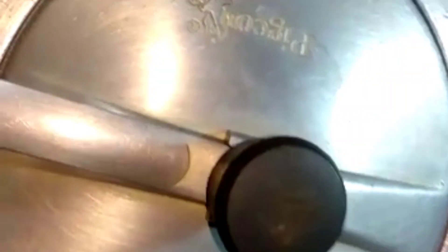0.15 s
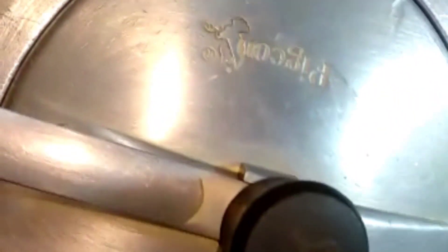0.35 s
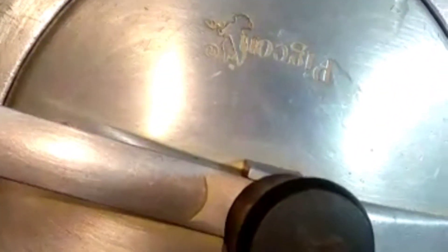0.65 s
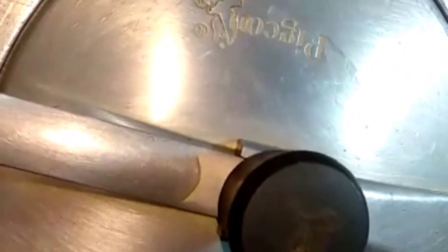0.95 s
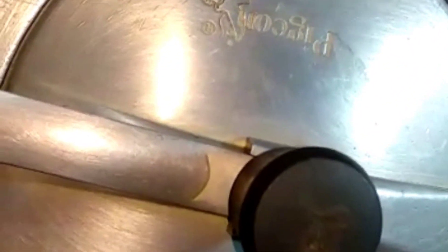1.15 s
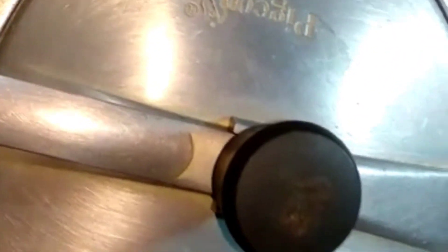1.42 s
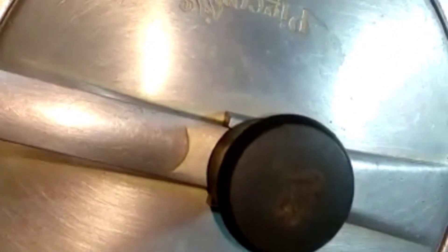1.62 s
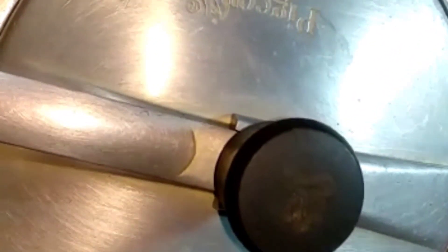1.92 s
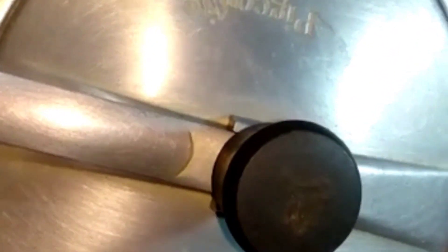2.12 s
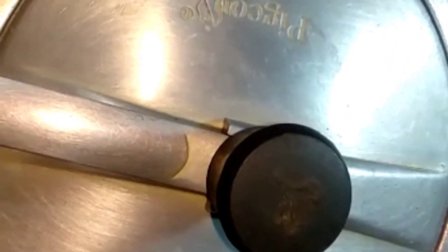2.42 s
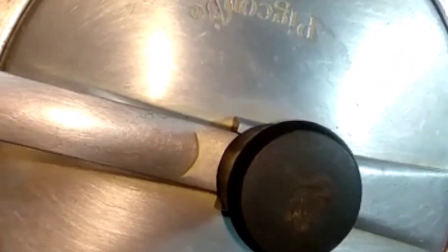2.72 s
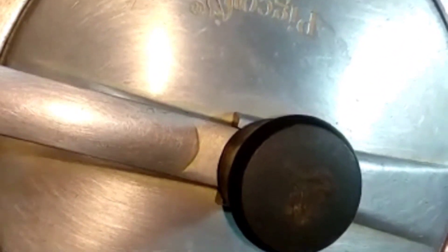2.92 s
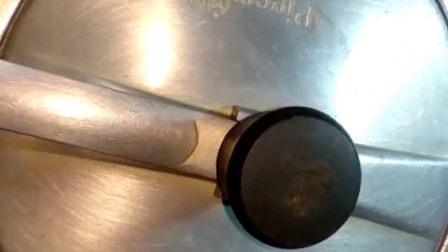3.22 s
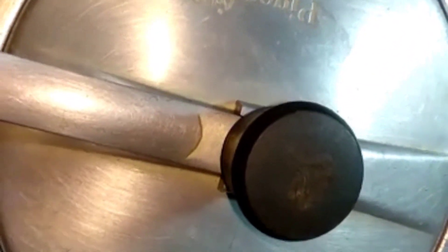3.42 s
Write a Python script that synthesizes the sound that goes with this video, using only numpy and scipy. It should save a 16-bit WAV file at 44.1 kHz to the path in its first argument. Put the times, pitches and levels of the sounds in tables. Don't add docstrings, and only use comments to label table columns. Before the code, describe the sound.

A pressure cooker hisses and thumps softly, its valve releasing three short sharp puffs of steam.

```python
import sys
import numpy as np
from scipy import signal
from scipy.fft import rfft, irfft, next_fast_len
from scipy.io import wavfile
from scipy.ndimage import uniform_filter1d, map_coordinates

SR = 44100
rng = np.random.default_rng(int(sys.argv[2]) if len(sys.argv) > 2 else 0)


def linear_from_db(decibels):
    return 10 ** (np.asarray(decibels, float) / 20)


def store_pcm(level_fs):
    pcm = np.round(np.clip(level_fs, -1, 1) * 32767).astype(np.int16)
    wavfile.write(sys.argv[1], SR, np.atleast_2d(pcm).T)


N = 156555

# f/Hz, level/dB
LEAK_COLOUR = [(180, -12.5), (300, -3.5), (540, -5.5), (2000, -11.5), (4200, -15), (6500, -11),
               (11000, -9.5), (14200, -16), (16500, -20)]
# f/Hz, likeness (0 to 1)
LEAK_ALIKE = [(60, 1), (180, .95), (650, 0.55), (1300, 0.05), (15000, 0.02)]
# f/Hz, level/dB
LEAK_SIDE = [(60, -0.5), (150, 0), (380, 0), (950, 2.5), (2380, 5.5), (5980, 5.5), (15000, -8.5)]
# t/s, peak level/dB, f/Hz
THUMPS = [(0.028, -29, 120.6), (0.115, -25.5, 116), (0.19, -35, 118), (0.29, -54, 121), (0.434, -35, 111),
          (0.664, -33.5, 121), (0.769, -45, 114), (0.856, -35, 121), (1.001, -33, 122), (1.041, -24, 118.5),
          (1.213, -34, 127), (1.344, -31, 122), (1.508, -32, 123), (1.667, -29.5, 200), (1.742, -24, 112),
          (1.799, -57, 99.6), (1.869, -38, 106), (2.098, -35, 214), (2.229, -31.5, 95), (2.414, -36, 109),
          (2.49, -38.5, 111), (2.574, -23.5, 117), (2.699, -27.5, 104), (2.799, -22.5, 107),
          (2.894, -40, 239), (2.97, -25, 110), (3.189, -29, 184), (3.337, -26, 118.5), (3.48, -39.5, 221)]
# f/Hz, level/dB, share of the main tone's length
UPPER_TONES = [(188.3, -7.5, 0.49), (306, -9.5, 0.53), (82.5, -9, 0.49)]
# f/Hz, width/Hz, level/dB
BASE_TONES = [(74.4, 45, -13), (116.7, 17.5, 0), (193.8, 31.5, -6), (254.5, 45, -12.5), (331, 56, -15.5)]
# f/Hz, likeness (0 to 1)
BASE_ALIKE = [(30, 0.6), (60, 0.93), (90, 1), (300, 0.94)]
# t/s, peak level/dB, f/Hz, rattle level/dB
PINGS = [(0.14, -42.5, 740, -8), (0.187, -38, 784, -11), (0.516, -38.5, 850, -12),
         (0.858, -38.5, 1110, -26), (1.061, -15, 760, -8), (1.346, -32, 872, -13), (1.525, -28.5, 884, -32),
         (1.729, -33, 760, -7), (1.805, -32, 1020, -4.5), (1.873, -44, 880, -6), (2.102, -34.5, 825, -25),
         (2.145, -25.5, 756, -8), (2.233, -29.5, 705, -31), (2.29, -42, 735, -16), (2.337, -30.5, 910, -7),
         (2.398, -27.5, 715, -10.5), (2.444, -33, 730, -21), (2.669, -17.5, 795, -18.5),
         (2.848, -36.5, 684, 7), (2.961, -20, 744, -15), (3.071, -31, 762, -3.5), (3.104, -19, 772, -11.5),
         (3.238, -17, 900, -10)]
# f/Hz, level/dB, t60/s (not used)
WALL_TONES = [(528, 4.5, 0.13), (685, 3, 0.32), (872, 3, 0.22), (966, -42, 0.56), (1099, -5.5, 0.21),
              (1186, -35, 0.38), (1710, -4, 0.27), (2000, -32.5, 0.24), (2090, -47, 0.59), (2410, -24, 0.2)]
# f/Hz, level/dB, t60/s (not used)
WALL_LOWEST = (335, -8.5, .3)
# f/Hz, level/dB
RATTLE_COLOUR = [(590, -7), (1000, -0.5), (1340, -8.5), (2350, -5.5), (10600, -20), (15200, -29),
                 (15900, -27), (16500, -55)]
# f/Hz, likeness (0 to 1)
KNOCK_ALIKE = [(60, 0.97), (240, 0.85), (800, 0.8), (1300, 0.03), (15000, 0.05)]
# f/Hz, level/dB
KNOCK_SIDE = [(60, 0.5), (180, 3), (550, -0.5), (1650, 6.5), (4970, 8), (15000, -5.5)]
# t/s, level/dB, t60/s
SPITS = [
    (1.0605, -30.5, 0.18),
    (2.669, -46, .03),
    (3.104, -41, .05),
    (1.805, -48, .03),
]
# f/Hz, level/dB
SPIT_COLOUR = [(500, -30), (2000, -21), (8000, 11), (12000, 1), (15500, -5)]
# t/s, level/dB
CLATTER = [
    (1.061, -28.5),
    (1.079, -40),
    (3.221, -30.5),
    (3.237, -16.5),
    (3.246, -15),
    (3.251, -12.5),
    (3.261, -22.5),
    (3.271, -24),
    (3.282, -29),
]
# f/Hz, level/dB, t60/s
LID_TONES = [(319.6, -10, 0.26), (501, -3, 0.15), (595, -1, 0.17), (683, -9.5, 0.43), (928, 10, 0.062),
             (1050, 2, 0.28), (1114, 1.5, 0.21), (1606, -11, 0.1), (1720, -1, 0.13), (1830, -15, 0.17),
             (2207, -33, 0.39), (2340, -2, 0.28), (2358, -18, 0.14), (2778, -9, 0.2)]
# t/s, peak level/dB, jet held/s, closing/s per 20 dB, spray level/dB, whistle f/Hz
LIFTS = [
    (1.5224, -8.5, 0.095, 0.22, -12.5, 9030),
    (2.14, -12.5, 0.1, 0.33, -8, 8370),
    (2.8453, -12, 0.11, 0.26, -1.5, 8360),
]
# f/Hz, level/dB
POP_COLOUR = [(290, -38), (500, -21), (1430, -11), (3450, -4.5), (4830, -7.5), (8930, 2.5), (10000, -5.5),
              (13200, -4.5), (16500, -29)]
# f/Hz, level/dB
POP_SIDE = [(60, -2.5), (240, 20), (950, 7), (3770, 12.5), (15000, -6)]
# f/Hz, level/dB
JET_COLOUR = [(260, -16), (500, -3.5), (1100, -16.5), (4500, -14.5), (6500, -13), (10000, -10),
              (13000, -4.5), (15800, -26)]
# f/Hz, likeness (0 to 1)
JET_ALIKE = [(60, 0.92), (240, 0.73), (700, 0.5), (1300, 0.03), (15000, 0.05)]
# f/Hz, level/dB
JET_SIDE = [(60, -0.5), (180, -2), (550, -1.5), (1650, -6), (4970, 8), (15000, -1)]
# f/Hz, level/dB
SPRAY_COLOUR = [(300, -46), (600, 7), (3000, 1), (6000, -2.5), (15500, -1.5), (16500, -30)]
# f/Hz, rarity/sigma
GAPS = [(2600, 1.7), (3600, 1.1), (5500, 1.15), (7000, 1.7), (9300, 1.3), (15000, 1.4)]

STEAM_RISE_S, JET_DB = 0.00089, -18


def unit(x):
    return x / np.sqrt(np.mean(x ** 2) + 1e-20)


def along(points, hz):
    f, v = np.transpose(points)
    return np.interp(np.log(hz + 1), np.log(f + 1), v)


def colour(points):
    return lambda hz: linear_from_db(along(points, hz))


def wobble(rate):
    knots = rng.standard_normal(int(N * rate / SR) + 4)
    return map_coordinates(knots, [np.arange(N) * rate / SR])


def filtered(x, response):
    m = next_fast_len(N + SR // 2)
    return irfft(rfft(x, m) * response(np.fft.rfftfreq(m, 1 / SR)), m)[..., :N]


def peaks(rows):
    def response(f):
        total = 0
        for k, (centre, width, db) in enumerate(rows):
            damping = 1j * f * width
            total = total + (-1) ** k * linear_from_db(db) * damping / (centre ** 2 - f * f + damping)
        return total
    return response


def rush(gain, alike, side, patchy_db):
    z = signal.stft(rng.standard_normal((2, N)), nperseg=512)[2]
    patches = uniform_filter1d(rng.standard_normal(z.shape[1:]), size=5, axis=0)
    patches = unit(uniform_filter1d(patches, size=9, axis=1))
    pair = signal.istft(z * linear_from_db(patchy_db * patches), nperseg=512)[1][:, :N]
    m = next_fast_len(N)
    hz = np.fft.rfftfreq(m, 1 / SR)
    shared, opposed = rfft(pair, m)
    turn = np.arccos(np.clip(along(alike, hz), -1, 1)) / 2
    tilt = linear_from_db(along(side, hz) / 2)
    shared, opposed = np.cos(turn) * shared, np.sin(turn) * opposed
    ports = np.array([(shared + opposed) * tilt, (shared - opposed) / tilt])
    out = irfft(ports * gain(hz) / np.cos(turn), m)[:, :N]
    return out / np.std(out.mean(axis=0))


def swell(db, rise_s, t60):
    return lambda t: linear_from_db(db - 60 * t / t60) * (1 - np.exp(-(t / rise_s) ** 2))


def lay(shapes):
    out, t = np.zeros(N + SR), np.arange(SR // 2) / SR
    for s, shape in shapes:
        out[max(round(s * SR), 0):][:len(t)] += shape(t)
    return out[:N]


def lay_power(rows, t60):
    def power(db):
        return lambda t: swell(db, 0.0028, t60)(t) ** 2
    return lay([(s, power(db)) for s, db in rows]) ** .5


def leak():
    level = linear_from_db(-43.5 + 0.26 * wobble(3.5) + 1.0 * wobble(29.98))
    return level * rush(colour(LEAK_COLOUR), LEAK_ALIKE, LEAK_SIDE, patchy_db=.6)


def churning():
    def stir(db):
        return lambda t: linear_from_db(db - 12.5 - 60 * t / 0.44)
    churn = lay([(s, stir(db)) for s, db, _ in THUMPS])
    simmer = linear_from_db(-50 + 4.5 * wobble(9.54) + 2.2 * wobble(21.87))
    return (churn + simmer) * rush(peaks(BASE_TONES), BASE_ALIKE, LEAK_SIDE, patchy_db=1.5)


def thumps():
    rise_s, length_s = 0.0069, 0.038

    def jolt(db, main_hz):
        def shape(t):
            total = 0
            for hz, more, share in [(main_hz, 0, 1)] + UPPER_TONES:
                fade_db = 8.0 * (t / (length_s * share)) ** 2
                total = total + linear_from_db(db + more - fade_db) * np.sin(2 * np.pi * hz * t)
            return (1 - np.exp(-t / rise_s)) * total
        return shape
    return lay([(s - .003, jolt(db - 5, hz)) for s, db, hz in THUMPS])


def pings():
    chirp_per_s = 25.7

    def bubble(db, hz):
        envelope = swell(db + 3, 0.00091, 0.023)
        return lambda t: envelope(t) * np.sin(2 * np.pi * 0.889 * hz * t * (1 + chirp_per_s * t))
    balance_db = [[.6], [-.6]]
    return lay([(s, bubble(db, hz)) for s, db, hz, _ in PINGS]) * linear_from_db(balance_db)


def wall_ring():
    hits = [(s + 0.0015, db - 16) for s, db, *_ in PINGS] + [(s, db - 14) for s, db in CLATTER]
    tones = []
    for hz, db, _ in [WALL_LOWEST] + WALL_TONES:
        width_hz = 34 * (hz / 500) ** 0.31
        tones.append((hz, width_hz, 1.06 * db - 3.5 * np.log2(hz / 500)))
    return lay_power(hits, 0.26) * rush(peaks(tones), KNOCK_ALIKE, KNOCK_SIDE, patchy_db=1.5)


def rattle():
    clatter_db = -7.5
    hits = [(s + 0.0015, db + more) for s, db, _, more in PINGS]
    hits += [(s, db + clatter_db) for s, db in CLATTER]
    echo = lay_power([(s, db + clatter_db - 13.5) for s, db in CLATTER], 0.42)
    level = (lay_power(hits, 0.13) + echo) * linear_from_db(1.0 * wobble(300))
    return level * rush(colour(RATTLE_COLOUR), KNOCK_ALIKE, KNOCK_SIDE, patchy_db=1.0)


def spits():
    level = lay([(s, swell(db, 0.00056, t60)) for s, db, t60 in SPITS])
    return level * rush(colour(SPIT_COLOUR), JET_ALIKE, KNOCK_SIDE, patchy_db=0.0)


def lid():
    hz, level, t60 = np.transpose(LID_TONES)[:, :, None]
    chance = rng.standard_normal((len(CLATTER), 3, len(LID_TONES), 1))

    def ring(db, luck, port):
        phase = 9 * luck[1] + port * np.arccos(along(KNOCK_ALIKE, hz)) * luck[2]
        gain_db = db - 11 + level + 3 * luck[0] + port * along(KNOCK_SIDE, hz)

        def shape(t):
            tones = linear_from_db(gain_db - 60 * t / t60) * np.sin(2 * np.pi * hz * t + phase)
            return tones.sum(axis=0) * (1 - np.exp(-t / 0.0015))
        return shape
    return np.array([lay([(s, ring(db, luck, port)) for (s, db), luck in zip(CLATTER, chance)])
                     for port in (.5, -.5)])


def pops():
    bursts = [(s - 0.00023, swell(db - 3, STEAM_RISE_S, 0.032)) for s, db, *_ in LIFTS]
    seeps = [(s - 0.0032, swell(db - 15.5, 0.0015, 0.028)) for s, db, *_ in LIFTS]
    level = lay(bursts + seeps) * linear_from_db(1.7 * wobble(1200))
    return level * rush(colour(POP_COLOUR), JET_ALIKE, POP_SIDE, patchy_db=-0.2)


def flow(db, held, closing):
    sag = swell(db, STEAM_RISE_S, 60 / 43.5)
    settle = swell(db - 6.5, STEAM_RISE_S, 0.13)
    echo = swell(db - 14.5, .05, 0.4)
    return lambda t: sag(t) * linear_from_db(-20 * np.maximum(t - held, 0) / closing) + settle(t) + echo(t)


def jets():
    def vent(top_hz):
        def gain(hz):
            below = hz < top_hz
            distance = (hz - top_hz) / np.where(below, 1700, 650)
            return linear_from_db(along(JET_COLOUR, hz) + 13 / (1 + distance ** np.where(below, 2, 6)))
        return gain
    total = 0
    for s, db, held, closing, _, top_hz in LIFTS:
        level = lay([(s, flow(db + JET_DB, held, closing))])
        total = total + level * rush(vent(top_hz), JET_ALIKE, JET_SIDE, patchy_db=1)
    return total * linear_from_db(1.1 * wobble(200) + 0.2 * wobble(24.92))


def spray():
    level = lay([(s, flow(db + JET_DB + more, held, closing)) for s, db, held, closing, more, _ in LIFTS])
    level = level * linear_from_db(1.64 * wobble(300))
    return level * rush(colour(SPRAY_COLOUR), JET_ALIKE, POP_SIDE, patchy_db=-1.4)


def scene():
    pot = leak() + churning() + thumps() + pings() + wall_ring() + rattle()
    return pot + spits() + lid() + pops() + jets() + spray()


def thin_treble(x):
    hz, t, z = signal.stft(x, SR, nperseg=1024)

    def blotches(bands, height, length):
        field = np.repeat(rng.standard_normal((bands, z.shape[2])), repeats=height, axis=0)[:513]
        return unit(uniform_filter1d(field, size=length, axis=1))
    field = blotches(103, 5, 5)
    streak = blotches(257, 2, 6)
    busy = sum((t > s) * (t < s + held + .05) for s, _, held, *_ in LIFTS)
    rarity = along(GAPS, hz)[:, None] - 1.1 * np.outer(hz > 9500, busy)
    gap = 1 / (1 + np.exp(-20 * (field - rarity)))
    gap = uniform_filter1d(gap, size=2, axis=0).clip(0, .5) * 2
    from_attack_s = np.min([abs(t - s) for s, *_ in LIFTS + CLATTER[:1]], axis=0)
    affected = np.outer(hz > 2600, from_attack_s > .016)
    gain_db = (-45 * gap + 3.2 * streak) * affected
    return signal.istft(z * linear_from_db(gain_db), SR, nperseg=1024)[1][:, :N]


def roll_off(x):
    return signal.sosfilt(signal.butter(12, 16810, fs=SR, output="sos"), x)


def record(dry):
    t = np.arange(N) / SR
    low_hz, top_hz, pop_top_hz = 41.6, 15880, 16800
    duck_db, ahead_s = -7, .0065
    dips = sum(np.exp(-((t - s + ahead_s) / (ahead_s * 0.3)) ** 2) for s, *_ in LIFTS)
    body = filtered(dry * linear_from_db(duck_db * dips),
                    lambda hz: (hz < top_hz) * (1j * hz / (low_hz + 1j * hz)) ** 3)
    opened = sum(np.exp(-((t - s - .005) / .009) ** 4) for s, *_ in LIFTS)
    air = opened * filtered(dry, lambda hz: (hz >= top_hz) * (hz < pop_top_hz))
    return roll_off(thin_treble(body + air))


dry = scene()
out = record(dry)
store_pcm(out)
```